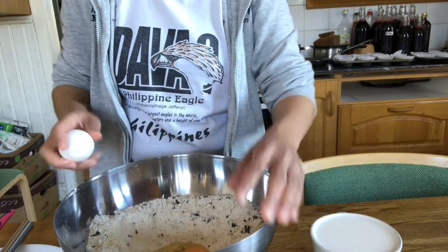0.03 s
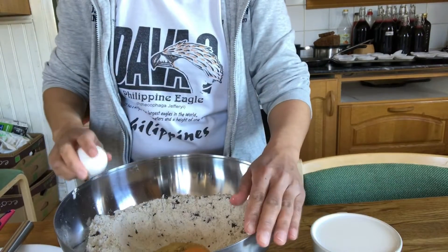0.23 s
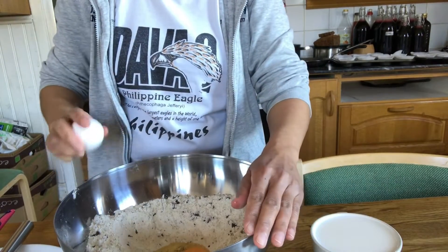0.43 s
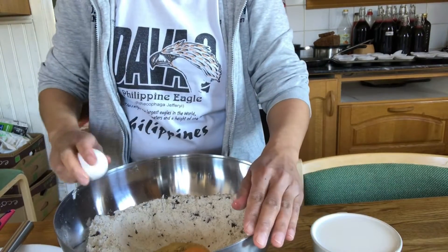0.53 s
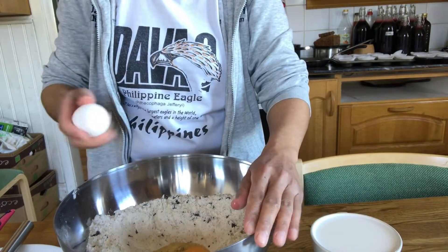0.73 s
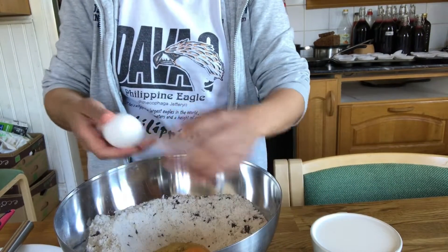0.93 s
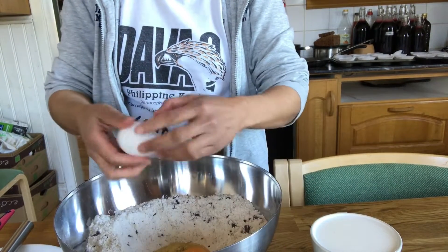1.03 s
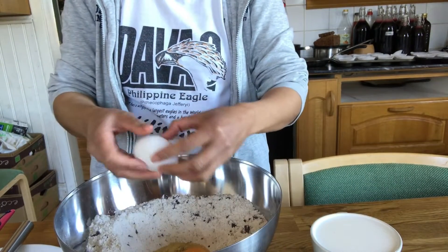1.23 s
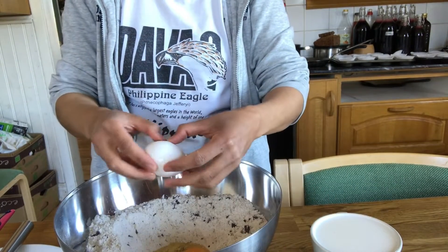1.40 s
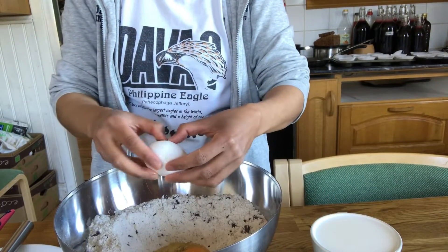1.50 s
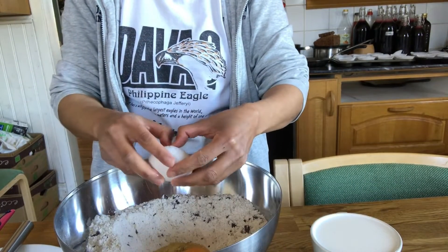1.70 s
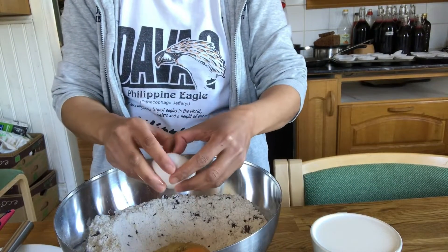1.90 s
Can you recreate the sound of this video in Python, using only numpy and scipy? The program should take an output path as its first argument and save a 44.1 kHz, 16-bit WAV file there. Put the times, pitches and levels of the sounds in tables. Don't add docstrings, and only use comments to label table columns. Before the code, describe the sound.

Egg against metal bowl rim, heard close: light ticks and dry skin rubbing, a dull tap, a much harder snapping blow, then near quiet with small shell crackles over a low fridge hum, slight room echo.

```python
import sys
import numpy as np
from scipy import signal
from scipy.fft import rfft, irfft
from scipy.io import wavfile

SR = 44100
rng = np.random.default_rng(int(sys.argv[2]) if len(sys.argv) > 2 else 0)


def store_wav(level_fs):
    pcm = np.round(np.clip(np.atleast_2d(level_fs), -1, 1) * 32767)
    wavfile.write(sys.argv[1], SR, pcm.T.astype(np.int16))


def voltage_ratio(decibels):
    exponent = np.asarray(decibels, float) / 20
    return 10 ** exponent


N = 85995


def scaled_to_rms_one(x):
    return x / np.sqrt(np.mean(x ** 2) + 1e-20)


def read_table(points, hz):
    f, value = np.transpose(points)
    return np.interp(np.log(hz + 1), np.log(f + 1), value)


def add_at(mix, time_s, sound):
    part = mix[round(time_s * SR):][:len(sound)]
    part += sound[:len(part)]


def coloured(x, colour):
    gain = voltage_ratio(read_table(colour, np.fft.rfftfreq(len(x), 1 / SR)))
    return irfft(rfft(x) * gain, len(x))


def coloured_click(colour):
    hz = abs(np.fft.fftfreq(1024, 1 / SR))
    log_gain = np.log(voltage_ratio(read_table(colour, hz)))
    click = np.fft.ifft(np.exp(np.conj(signal.hilbert(log_gain)))).real[:512]
    return click / np.linalg.norm(click)


def dying_tone(hz, db, t60, rise_s):
    t = np.arange(0, t60 * 1.2 + .002, 1 / SR)
    soft_start = 1 - np.exp(-t / rise_s)
    return voltage_ratio(db - 60 * t / t60) * np.sin(2 * np.pi * hz * t) * soft_start


def struck_body(modes, body_db, spread, rise_s):
    out = np.zeros(SR)
    for k, (hz, db, t60) in enumerate(modes):
        sign = (-1) ** k
        add_at(out, 0, sign * dying_tone(hz, body_db + db + 3.5, t60, rise_s))
        for detune, late in rng.random((2, 2)):
            near_hz = hz * (1 + spread * (2 * detune - 1))
            add_at(out, late / hz, dying_tone(near_hz, body_db + db - 12, t60, rise_s))
    return out


# (time [s], thud [dB], table boom [dB], rim ring [dB], rim rise [s])
BLOW_EVENTS = [
    (0.036, -58.5, -68.5, -88, .001),
    (0.2833, -30.5, -58.5, -41.5, 0.0021),
    (0.2896, -48.5, -79, -37, .003),
    (.3510, -47, -61, -58, 0.002),
    (0.5423, -31.5, -35.5, -17, .0004),
    (0.5451, -46, -69.5, -22.5, 0.00052),
]
# (pitch [Hz], level [dB], t60 [s])
BOWL_HARD = [(207.5, 0, 0.15), (252, -3.5, 0.13), (331.2, -3, 0.064), (390, -7.5, .04), (588, -9.5, 0.069),
             (679, 1.5, 0.062), (843, -3, 0.07), (1028, -4.5, .06), (1223.7, -4, 0.08), (1376, -3.5, 0.011),
             (1650, -8.5, .025), (1906, 2, 0.014)]
# (pitch [Hz], level [dB], t60 [s])
BOWL_LIGHT = [(190, -5.5, .07), (249, -4, 0.24), (287.8, 2.5, 0.061), (486, -8.5, .09), (520, -1, 0.056),
              (620, -4.5, 0.059), (670, 5, 0.027), (760, -9.5, .08), (953, -11, .12), (1160, -4.5, .03),
              (1430, -9, .03), (1940, -4.5, .03), (2300, -8, .03)]
# (pitch [Hz], level [dB], t60 [s])
TABLE_MODES = [(57.33, -9.5, .8), (82, -6, 0.34), (125.3, -4.5, 0.51), (148.7, -6.5, 0.25)]
# (pitch [Hz], level [dB], t60 [s])
RIM_MODES = [(3200, -16.5, .01), (3996, -15, .012), (4500, -5.5, 0.01395), (5000, -18.5, .015),
             (5500, -4.5, .016), (5750, -9, 0.02), (6070, 1, 0.019), (6450, -1, 0.024), (6800, -5, .018),
             (7080, -8, 0.013), (7800, -17.5, .012), (8220, -10.5, 0.0081), (9470, -11.5, .008)]


def blows():
    out = np.zeros(N)
    for time_s, thud_db, boom_db, rim_db, rim_rise_s in BLOW_EVENTS:
        bowl = BOWL_HARD if time_s > .5 else BOWL_LIGHT
        add_at(out, time_s, struck_body(bowl, thud_db, .05, .0008))
        add_at(out, time_s, struck_body(TABLE_MODES, boom_db, .05, .03))
        add_at(out, time_s, struck_body(RIM_MODES, rim_db, .025, rim_rise_s))
    return out


# (pitch [Hz], level [dB])
TICK_TONE = [(300, -20.5), (1200, -5.5), (2500, -1.5), (5000, -3), (7000, -3.5), (10000, -11.5),
             (16000, -12)]


def contacts(events, overtone_db):
    out = np.zeros(N)
    t = np.arange(600) / SR
    tick = coloured_click(TICK_TONE)
    for time_s, db, hz, t60, tick_db in events:
        add_at(out, time_s, dying_tone(hz, db + 2.5, t60, 0.66 / hz))
        add_at(out, time_s, dying_tone(hz * 1.6, db + overtone_db, t60 * 0.49, 0.00013))
        slips = 0.19 * rng.standard_normal(600) * voltage_ratio(-60 * t / 0.016)
        slips[0] += 1
        add_at(out, time_s, voltage_ratio(db + tick_db) * np.convolve(slips, tick))
    return out


# (time [s], peak level [dB], pitch [Hz], t60 [s], bright tick [dB])
SNAP_EVENTS = [(.5417, -8, 2010, 0.0059, -14), (.5421, -7, 1925, 0.0059, 5.5),
               (.5430, -18, 2240, 0.0055, 1), (.5437, -26.5, 4550, 0.0082, 12),
               (.5455, -24.5, 1400, .01, 3.5), (.7492, -50, 4050, 0.0068, 14),
               (.9503, -56.5, 2002, 0.0083, 2.5), (.9692, -62, 1803, 0.0091, 11),
               (1.1568, -61.5, 2300, .012, -2), (1.19, -66.5, 3200, 0.011, -0.5),
               (1.4334, -52, 2610, 0.0076, 10.5), (1.592, -63.5, 2187, 0.011, 1),
               (1.6440, -63, 6980, .006, 9), (1.6572, -61, 5470, 0.0069, 9.5),
               (1.7657, -55, 3300, 0.0034, 6), (1.8060, -61, 7200, 0.0067, 9),
               (1.8140, -66, 7240, 0.0037, -4.5), (1.8320, -65.5, 4560, 0.0075, 13),
               (1.8372, -44, 1596, 0.007, 1), (1.8471, -50, 5420, 0.0069, 12.5),
               (1.8478, -58, 3080, 0.0093, 6), (1.8483, -48, 1880, 0.011, 10),
               (1.8410, -56.5, 2600, 0.0035, 4), (1.8500, -69, 2580, 0.0044, -5),
               (1.8522, -59, 3860, 0.003, 7), (1.8538, -48.5, 1670, 0.0092, 8),
               (1.8680, -63, 2600, 0.0093, 17)]


def shell_snaps():
    return contacts(SNAP_EVENTS, -18.5)


# (time [s], peak level [dB], pitch [Hz], t60 [s], bright tick [dB])
CLINK_EVENTS = [(.0224, -39, 1850, 0.018, -2), (.0236, -40.5, 1800, 0.0084, 7),
                (.0254, -35, 2500, 0.008, -12), (.0275, -42.5, 420, 0.022, -25),
                (.0380, -21, 1810, 0.0086, -2.5), (.0383, -26, 3070, 0.0095, -9.5),
                (.0386, -26, 2350, 0.007, -7.5), (.0480, -53, 1900, .008, -3.5),
                (.0503, -24.5, 910, 0.028, -0.5), (.0502, -24.5, 1200, .009, -22),
                (.0506, -51, 3920, 0.057, -3), (.0510, -38, 2500, .01, -5), (.0705, -40, 950, .025, -28),
                (.0687, -26.5, 1850, 0.0072, -12), (.1285, -24, 2774, 0.0053, -4),
                (.1288, -38, 3250, 0.0094, -10), (.1296, -28.5, 1570, 0.012, -35),
                (.1298, -35, 900, .012, -33.5), (.1350, -42, 1550, .012, -20),
                (.1420, -41.5, 1400, .004, 1), (.1494, -31.5, 1650, 0.018, -20),
                (.1590, -42.5, 1700, 0.014, -13), (.2630, -23, 1850, 0.0093, -22),
                (.2632, -31, 3050, 0.0091, -10.5), (.2664, -24, 2100, 0.007, -18),
                (.2740, -49, 1900, 0.028, -31.5), (.2826, -36.5, 2400, 0.017, 7),
                (.2877, -32.5, 1950, 0.018, -6.5), (.2905, -36.5, 2300, 0.027, -3.5),
                (.2930, -38.5, 1750, .02, -3.5), (.3512, -25.5, 1800, 0.00533, -4),
                (.3870, -57.5, 7400, 0.0034, -9.5), (.4520, -61.5, 5000, 0.006, 10),
                (.5048, -55.5, 1900, 0.027, 4), (.5190, -62, 2200, 0.011, 2),
                (.5300, -36.5, 3130, 0.00501, 8), (.5342, -35, 3300, 0.005, 1.5)]


def clinks():
    return contacts(CLINK_EVENTS, -12.5)


# (time [s], level [dB])
RUB_LEVEL = [(0, -57.5), (.03, -57.5), (.1, -58.5), (.165, -63), (.186, -54), (.205, -54), (.223, -49.5),
             (.238, -64), (.258, -68.5), (.275, -58), (.4, -66.5), (.52, -74), (.56, -99)]
# (pitch [Hz], level [dB per Hz])
RUB_TONE = [(250, -13), (500, -15), (950, -6.5), (2100, 0), (3100, -6), (4200, -15), (6500, -19),
            (16000, -44.5)]


def rub():
    slips_per_s = 3900
    size = voltage_ratio(3 * np.minimum(rng.exponential(1, N), 4))
    happens = rng.random(N) < slips_per_s / SR
    slips = size * happens * rng.choice([-1, 1], N)
    time_s, db = np.transpose(RUB_LEVEL)
    level = voltage_ratio(np.interp(np.arange(N) / SR, time_s, db))
    return level * scaled_to_rms_one(coloured(slips, RUB_TONE))


def squeak():
    middle_s, length_s, pitch_hz, width_hz = .822, .0085, 6820, 370
    t, hz = np.arange(N) / SR, np.fft.rfftfreq(N, 1 / SR)
    band = np.exp(-((hz - pitch_hz) / width_hz) ** 2)
    noise = irfft(rfft(rng.standard_normal(N)) * band, N)
    swell = np.exp(-((t - middle_s) / length_s) ** 2)
    return voltage_ratio(-68.5) * scaled_to_rms_one(noise) * swell


# (time [s], dull [dB], bright [dB])
WALL_PUSHES = [
    (0.039, -29.5, -37),
    (.2830, 0.5, -14.5),
    (0.352, -23, -31.5),
    (.5420, 3.5, 7),
]
# (pitch [Hz], level [dB])
DULL_TONE = [(50, -15.5), (120, 0.5), (250, 5), (420, -2), (680, 4), (1100, 2.5), (2000, -9), (16000, -53)]
# (pitch [Hz], level [dB])
BRIGHT_TONE = [(800, -3), (2500, 5), (4500, -0.5), (5400, 0.5), (6300, 0), (7400, -7), (11000, -11.5),
               (16000, -6.5)]


def knocks():
    dull, bright = np.zeros((2, N))
    for time_s, dull_db, bright_db in WALL_PUSHES:
        add_at(dull, time_s, voltage_ratio([dull_db]))
        add_at(bright, time_s, voltage_ratio([bright_db]))
    return coloured(room(dull), DULL_TONE) + coloured(room(bright), BRIGHT_TONE)


# (pitch [Hz], t60 [s])
ROOM_DECAY = [(100, 0.94), (300, 0.36), (1000, 0.47), (3000, 0.36), (6000, 0.43), (10000, 0.22),
              (15000, 0.21)]
# (pitch [Hz], level [dB])
ROOM_TONE = [(100, -3), (500, 5.5), (1500, -3.5), (4000, -9), (7000, -3), (15000, -4.5)]


def room(x):
    taps = np.zeros(SR)
    at = np.arange(round(0.0036 * SR), SR - 20, 10)
    taps[at + rng.integers(0, 10, len(at))] = rng.choice([-1., 1.], len(at))
    hz, t, z = signal.stft(taps, SR, nperseg=256)
    db = read_table(ROOM_TONE, hz)[:, None] - 60 * t / read_table(ROOM_DECAY, hz)[:, None]
    tail = signal.istft(z * voltage_ratio(db), SR, nperseg=256)[1]
    return signal.fftconvolve(x, tail / np.linalg.norm(tail))[:N]


# (pitch [Hz], level [dB per Hz])
AIR_TONE = [(30, -23.5), (100, -7.5), (190, -11.5), (420, -18.5), (900, -20), (4000, -33), (10000, -40),
            (16000, -40.5)]
# (pitch [Hz], level [dB], width [Hz])
FRIDGE_TONES = [(70, -74.5, 6), (102.7, -61, 0.89), (141, -67.5, 1.9), (198, -80.5, 2.3), (301.6, -79, 3),
                (393, -89, 3), (409.5, -76, 6.26), (693.4, -81.5, 13)]


def kitchen():
    t, hz = np.arange(N) / SR, np.fft.rfftfreq(N, 1 / SR)
    out = voltage_ratio(-65) * scaled_to_rms_one(coloured(rng.standard_normal(N), AIR_TONE))
    for pitch, db, width in FRIDGE_TONES:
        slow = irfft(rfft(rng.standard_normal((2, N))) * np.exp(-(hz / width) ** 2), N)
        waver = 1 + .1 * (scaled_to_rms_one(slow[0]) + 2j * scaled_to_rms_one(slow[1]))
        turning = np.exp(2j * np.pi * (pitch * t + rng.random()))
        out += voltage_ratio(db + 0.5) * (waver * turning).real
    return out


def scene():
    near = blows() + shell_snaps() + clinks()
    hands = rub() + squeak()
    far = room(hands + voltage_ratio(-9) * near) + knocks()
    return (near + hands + voltage_ratio(-7) * far + kitchen())[None]


def low_pass(x):
    return signal.sosfilt(signal.butter(12, 16970, fs=SR, output="sos"), x)


def record(dry):
    limit = .75
    squashed = limit * np.tanh(dry / limit)
    b, a = signal.butter(3, 48 / SR * 2, "high")
    low_cut = signal.lfilter(b, a, squashed)
    top_cut = signal.firwin(127, 16100, window=("kaiser", 9), fs=SR)[None]
    return low_pass(signal.oaconvolve(low_cut, top_cut, "same"))


dry = scene()
out = record(dry)
store_wav(out)
```